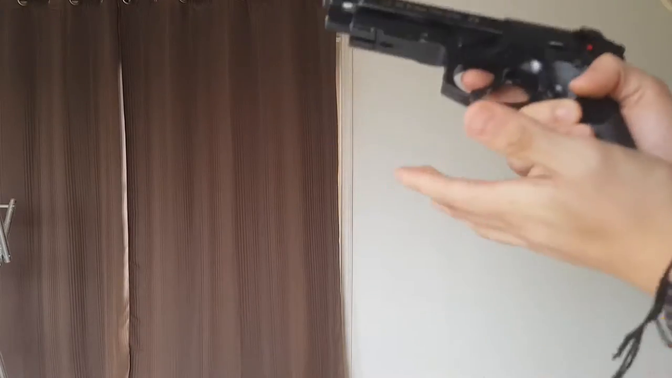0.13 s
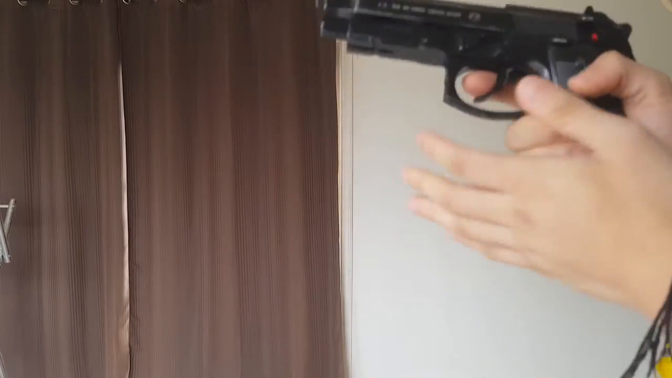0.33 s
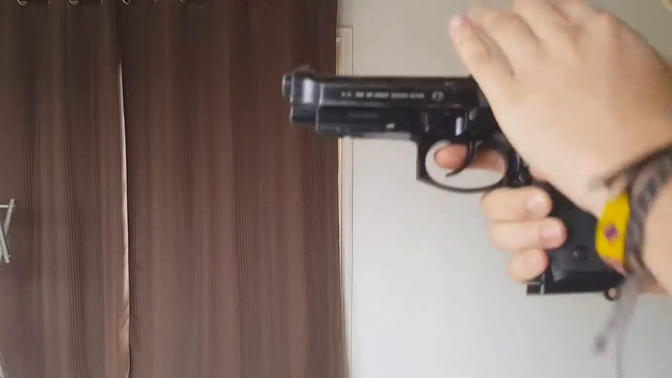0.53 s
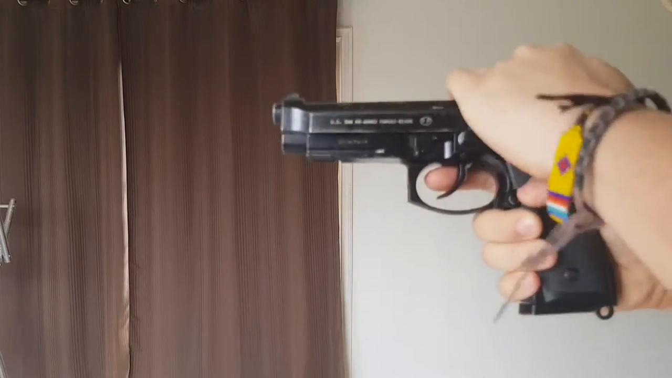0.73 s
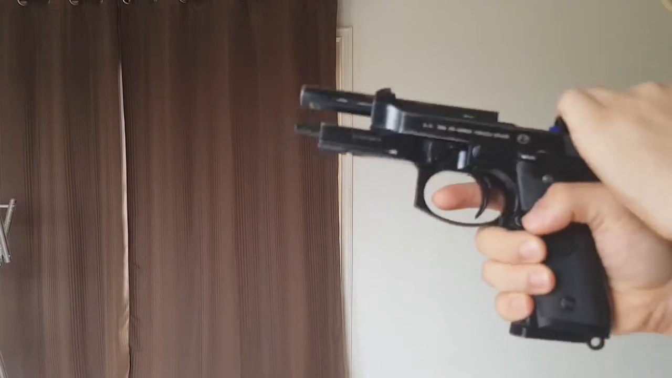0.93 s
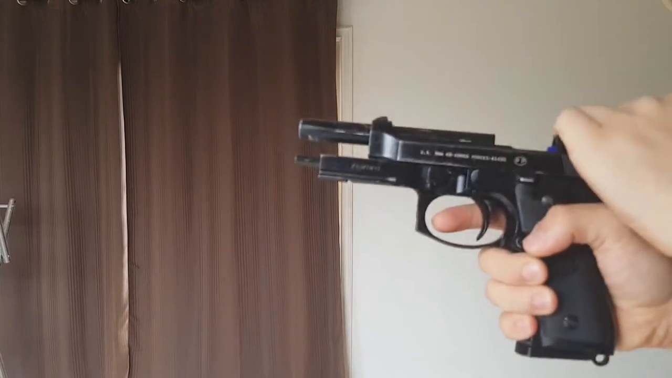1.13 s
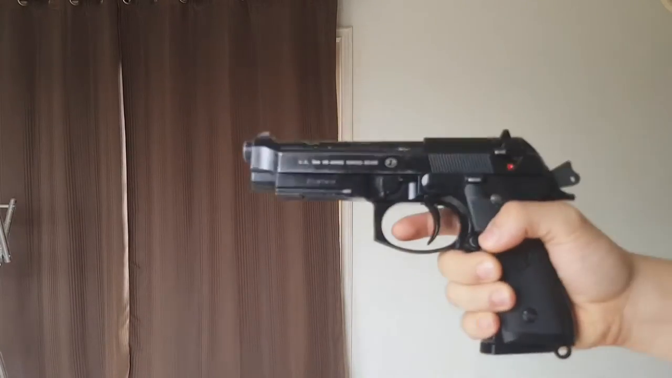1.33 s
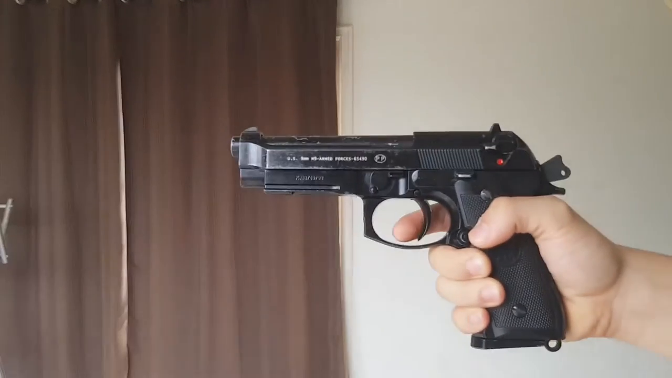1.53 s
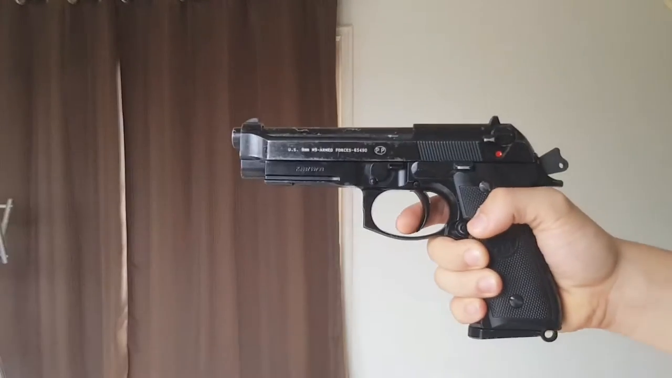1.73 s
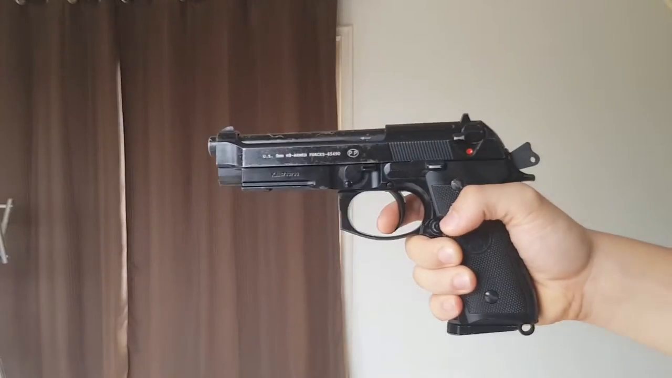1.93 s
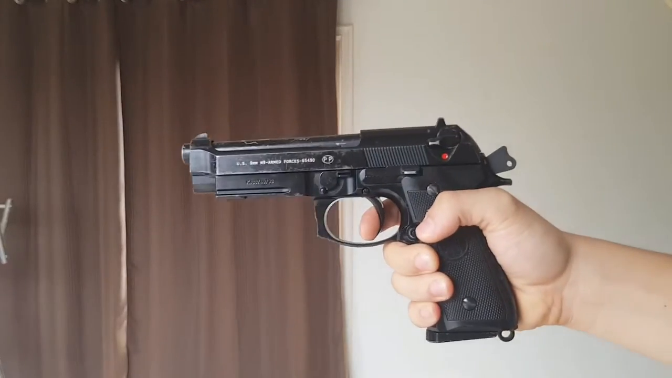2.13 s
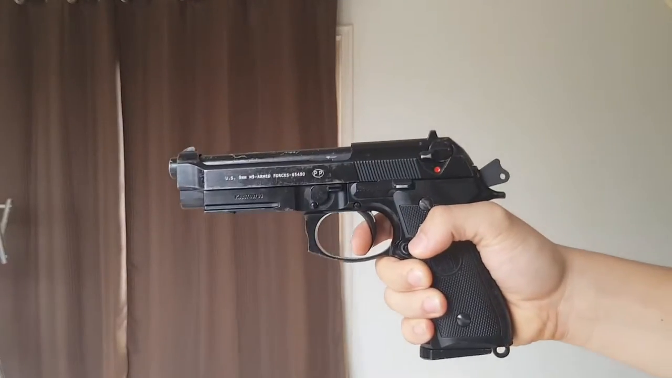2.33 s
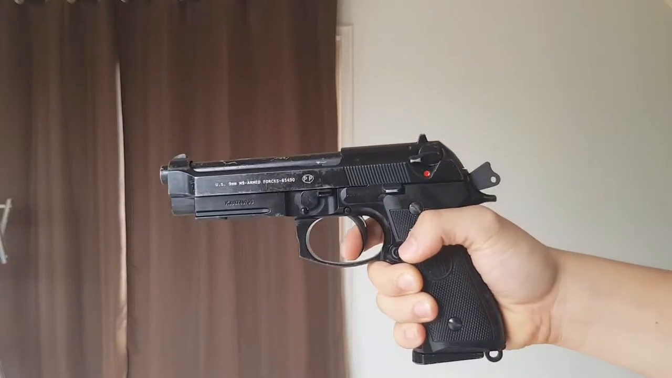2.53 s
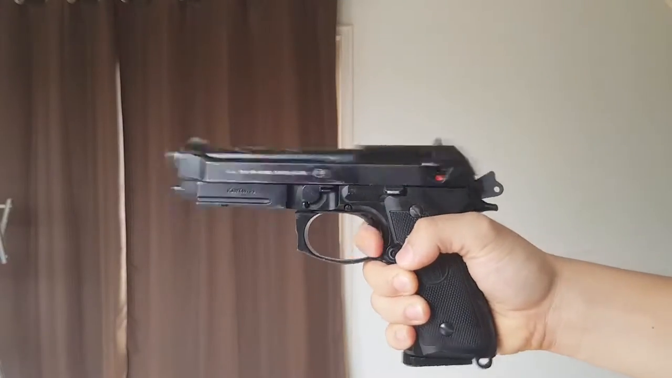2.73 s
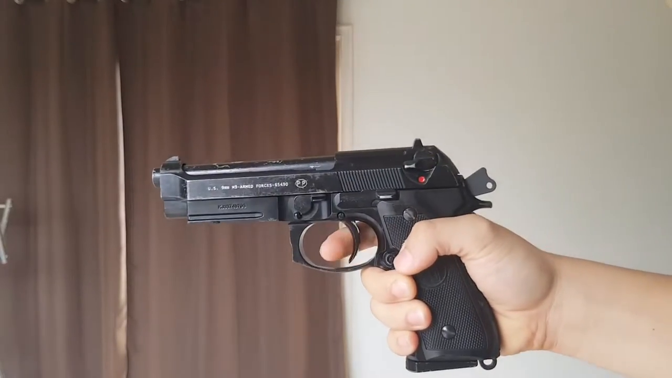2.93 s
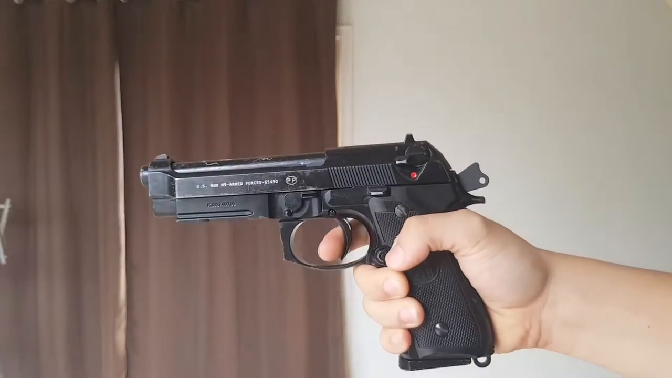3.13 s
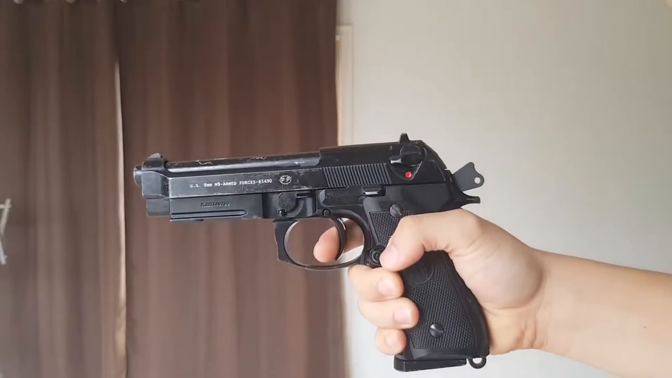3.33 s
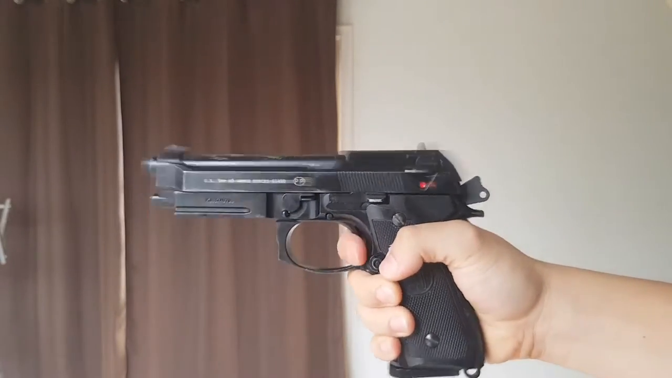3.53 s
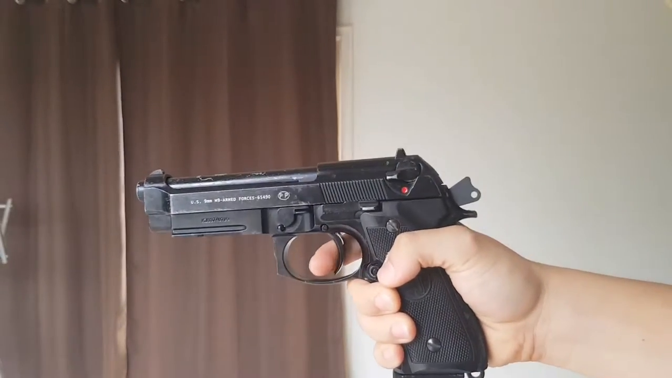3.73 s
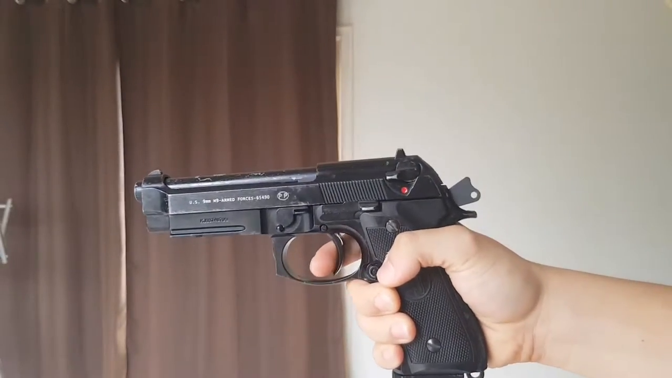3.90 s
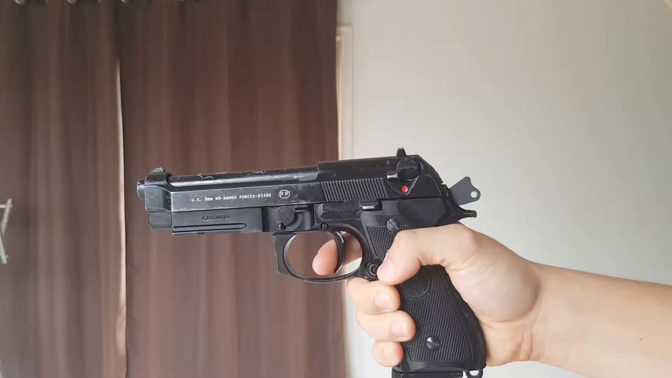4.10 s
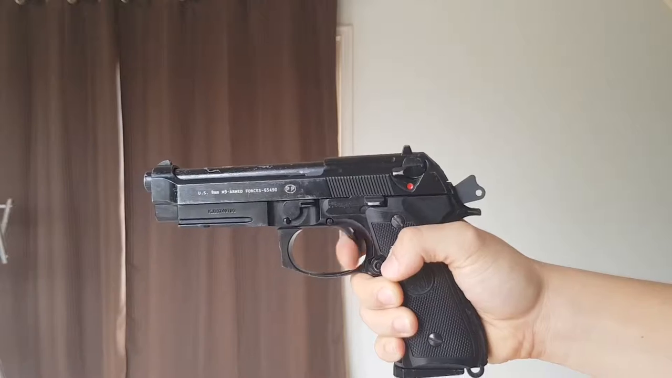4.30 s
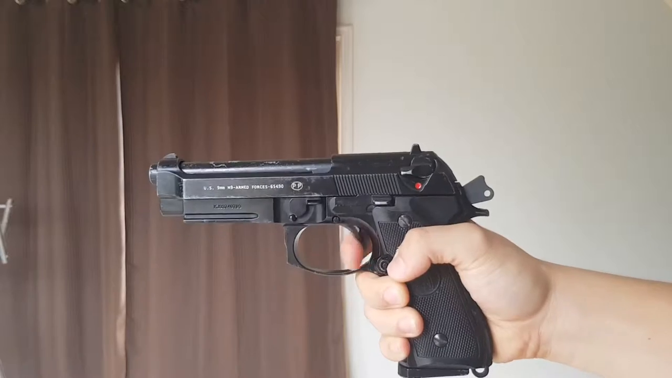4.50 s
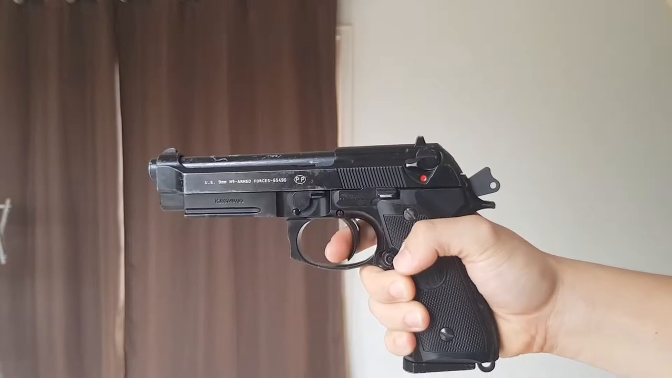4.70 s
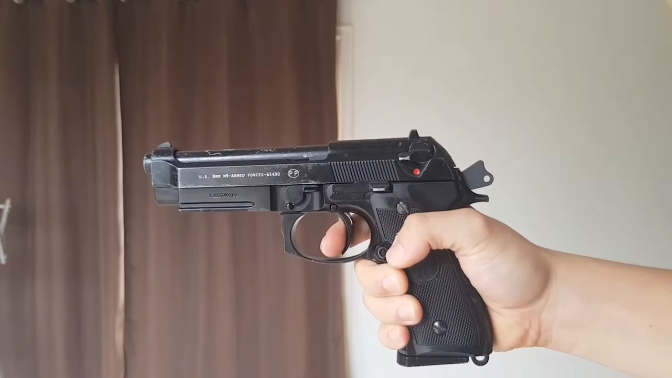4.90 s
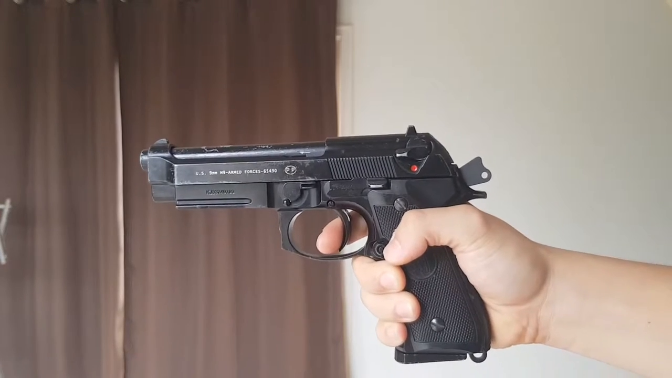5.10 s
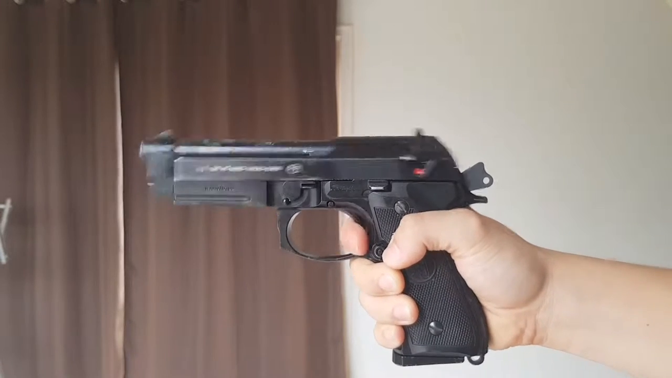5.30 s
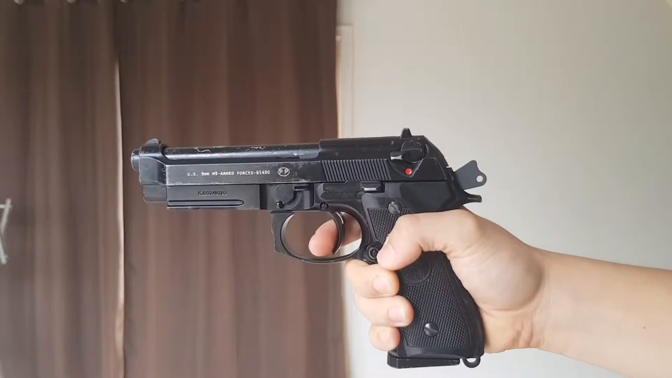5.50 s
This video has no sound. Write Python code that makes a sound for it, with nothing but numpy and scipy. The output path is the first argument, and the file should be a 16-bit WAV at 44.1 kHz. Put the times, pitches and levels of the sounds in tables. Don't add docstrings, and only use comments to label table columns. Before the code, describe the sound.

A phone close to a gas-powered replica pistol picks up a hard magazine knock, gritty steel clicks as the slide is pulled, and a loud multiple clack on release. After a pause with soft cloth rustle, four explosive gas pops ring briefly off the walls, with faint ticks and hiss between, over a low pulsing fan hum that gets quieter after each shot.

```python
import sys
import numpy as np
from scipy import signal
from scipy.fft import rfft, irfft, next_fast_len
from scipy.io import wavfile
from scipy.ndimage import uniform_filter1d, map_coordinates

SR = 44100
rng = np.random.default_rng(int(sys.argv[2]) if len(sys.argv) > 2 else 0)


def gain_from_db(level_db):
    decades = np.asarray(level_db, float) / 20
    return 10 ** decades


def to_wav(sig):
    pcm = np.clip(np.atleast_2d(sig), -1, 1) * 32767
    pcm = np.round(pcm).astype(np.int16)
    wavfile.write(sys.argv[1], SR, pcm.T)


N = 244755

MUZZLE_LAG, BREECH_LAG = 10, -2


def unit(x):
    return x / np.sqrt(np.mean(x ** 2) + 1e-20)


def along(points, hz):
    f, v = np.transpose(points)
    return np.interp(np.log(hz + 1), np.log(f + 1), v)


def wobble(rate):
    knots = rng.standard_normal(int(N * rate / SR) + 4)
    return map_coordinates(knots, [np.arange(N) * rate / SR])


def tilt(hz, db_per_octave):
    return db_per_octave * np.log2(np.clip(hz, 600, None) / 4000)


def ripple(depth_db, step_hz):
    knots = depth_db * rng.standard_normal(512)
    return lambda hz: np.interp(hz / step_hz, np.arange(len(knots)), knots)


def add(out, s, x):
    i = round(s * SR)
    out[:, i:i + x.shape[1]] += x[:, :out.shape[1] - i]


def noise(n, colour_db, alike):
    hz = np.fft.rfftfreq(n, 1 / SR)
    turn = np.arccos(np.clip(along(alike, hz), -1, 1)) / 2
    spectrum = rfft(rng.standard_normal((2, n))) * gain_from_db(colour_db(hz))
    mid, side = irfft(spectrum * [np.cos(turn), np.sin(turn)], n)
    return unit(np.array([mid + side, mid - side]))


def burst(colour_db, t60, alike, rise, lag):
    t = np.arange(4096) / SR
    fade = gain_from_db(-60 * t / t60) * (1 - np.exp(-t / rise))
    left, right = noise(len(t), colour_db, [(1000, alike)]) * fade
    left = np.pad(left, (max(-lag, 0), 0))[:len(t)]
    right = np.pad(right, (max(lag, 0), 0))[:len(t)]
    return np.array([left, right])


# (frequency [Hz], time to fall 60 dB [s])
ROOM_T60 = [(100, 0.79), (260, 0.69), (700, 0.65), (1840, 0.69), (4850, 0.57), (9000, 0.46), (12800, 0.38),
            (15200, 0.37)]
# (frequency [Hz], likeness [-1 to 1])
ROOM_ALIKE = [(60, -0.98), (180, 1), (550, 0.49), (1650, -0.088), (4970, 0.0717), (15000, -0.11)]


def reverb(colour_db, t60, rise):
    hz, t, z = signal.stft(noise(SR, colour_db, ROOM_ALIKE), SR, nperseg=256)
    fall_db = -60 * t / along(ROOM_T60, hz)[:, None]
    clumps = uniform_filter1d(rng.standard_normal(fall_db.shape), size=3, axis=0)
    clumps_db = 2.5 * unit(uniform_filter1d(clumps, size=6, axis=1))
    fade = gain_from_db(fall_db) + gain_from_db(-22.5 + fall_db / 2.27)
    tail = signal.istft(z * gain_from_db(clumps_db) * fade, SR, nperseg=256)[1]
    onset = 1 - np.exp(-np.arange(tail.shape[1]) / SR / rise)
    return tail * np.sqrt(t60) * onset


def ducking_db():
    fired = np.searchsorted(np.transpose(SHOTS)[0], np.arange(N) / SR)
    return -13 * (1 - 0.2 ** fired)


# (frequency [Hz], level [dB])
RUMBLE = [(15, -48), (30, -27.5), (50, -8), (66, -1), (80, -4.5), (97, -3), (125, -4), (158, -9),
          (200, -11.5), (250, -26), (300, -24), (500, -30), (1000, -38), (4000, -66)]
# (frequency [Hz], likeness [-1 to 1])
FAN_ALIKE = [(60, 0.99), (180, 1), (550, -0.082), (1650, -0.14), (4970, -0.01), (15000, -0.02)]
# (frequency [Hz], level [dB], unsteadiness [dB])
FAN_TONES = [(174.5, 1.5, 1.2), (268, -22, 3), (352, -28, 3)]


def fan():
    t = np.arange(N) / SR
    air = noise(next_fast_len(N, True), lambda hz: along(RUMBLE, hz), FAN_ALIKE)[:, :N]
    air = air * gain_from_db(0.37 * wobble(7.1))
    tones = np.zeros(N)
    for hz, db, loose_db in FAN_TONES:
        tones += gain_from_db(db + loose_db * wobble(5.3)) * np.sin(2 * np.pi * hz * t + 0.22 * wobble(1.8))
    beat_db = 1.5 * np.cos(2 * np.pi * (t - 0.87) / 0.91)
    return gain_from_db(-45 + beat_db + ducking_db()) * (air + tones) * gain_from_db([[1.1], [-1.1]])


# (middle [s], length [s], level [dB])
RUSTLES = [
    (2.318, .5, -65),
    (4.223, 0.26, -68),
]
# (frequency [Hz], level [dB per Hz])
CLOTH = [(150, -29.5), (350, -1), (700, -3), (1500, -11), (3000, -31), (8000, -60)]


def rustles():
    out = np.zeros((2, N))
    for middle, length, db in RUSTLES:
        n = round(length * SR)
        rub = noise(SR, lambda hz: along(CLOTH, hz), ROOM_ALIKE)[:, :n]
        add(out, middle - length / 2, gain_from_db(db) * np.hanning(n) * rub)
    return out


# (time [s], level [dB], time to fall 60 dB [s])
LEAKS = [
    (3.278, -55.5, 0.47),
    (4.292, -76.5, 0.38),
    (5.18, -81, 0.22),
]
# (frequency [Hz], level [dB per Hz])
LEAK = [(800, -31), (3000, 1.5), (6000, -4), (10000, -3), (15000, -11)]


def leaks():
    out, t = np.zeros((2, N)), np.arange(SR // 2) / SR
    for s, db, t60 in LEAKS:
        hiss = noise(len(t), lambda hz: along(LEAK, hz), ROOM_ALIKE)
        add(out, s, gain_from_db(db - 60 * t / t60) * (1 - np.exp(-t / 0.0022)) * hiss)
    return out


# (start [s], end [s], first level [dB], last level [dB])
SCRAPES = [
    (0.771, 0.848, -76, -57),
    (0.861, 0.948, -46, -47),
    (1.248, 1.282, -66.5, -48.5),
]
# (frequency [Hz], level [dB per Hz])
RAIL = [(500, -24.5), (1100, -6.5), (2500, 3.5), (3300, -17.5), (8000, -25.5), (15000, -29.5)]


def scrapes():
    out = np.zeros((2, N))
    for start, end, from_db, to_db in SCRAPES:
        n = round((end - start) * SR)
        grit = gain_from_db(2.4 * wobble(210)[:n])
        rub = noise(8192, lambda hz: along(RAIL, hz), ROOM_ALIKE)[:, :n]
        add(out, start, gain_from_db(np.linspace(from_db, to_db, n)) * grit * rub)
    return out


# (frequency [Hz], width [Hz], boost [dB])
RING = [(2160, 160, 4), (2614.4, 190, 4), (2890, 120, -0.5), (3859, 250, -1.5), (4630, 14, 10.5),
        (5400, 200, 1), (7229.8, 640, 5), (9400, 220, 3.5), (11640, 1000, 4.5)]


def slide_ring(hz, strength):
    return sum(k * db / (1 + (2 * (hz - c) / w) ** 2) for k, (c, w, db) in zip(strength, RING))


# (time [s], level [dB], time to fall 60 dB [s])
SEAT = [
    (0, -22.5, 0.16),
    (.004, -19.5, 0.056),
    (.019, -17.5, 0.077),
]
# (time [s], level [dB], time to fall 60 dB [s])
PULL = [(.794, -50.5, .015), (.814, -54, .025), (.840, -43.5, .015), (.856, -39, .02), (.860, -17, 0.0076),
        (.8622, -23, .015), (.879, -36.5, .03), (.897, -27.5, .025), (.914, -18.5, 0.034),
        (.918, -25.5, .015), (.927, -34.5, .02), (.940, -33, 0.028)]
# (time [s], level [dB], time to fall 60 dB [s])
RELEASE = [
    (1.259, -56.5, 0.034),
    (1.2795, -29.5, 0.039),
    (1.287, -21, 0.1),
    (1.296, -13, 0.035),
    (1.298, -10, .013),
    (1.303, -8.5, .022),
    (1.308, -27.5, 0.036),
    (1.315, -13, 0.022),
]
# (time [s], level [dB], time to fall 60 dB [s])
TAKE_UP = [
    (2.690, -41, 0.02689),
    (4.221, -68, 0.019),
    (5.227, -64.5, 0.01498),
]


def strikes():
    sears = [(s - 0.0285, -52.5, 0.014) for s, *_ in SHOTS]
    hammers = [(s - 0.014, click_db, 0.034) for s, *_, click_db in SHOTS]
    actions = [(SEAT, (-1.1, 1.1, 1, 1.1)),
               (PULL, (-1.2, -6.5, 0.85, 4)),
               (RELEASE, (-0.6, -2.5, 1.2, -1)),
               ([*TAKE_UP, *sears, *hammers], (-1.5, -4.5, 1.3211, -3))]
    rows = []
    for blows, (bright_db, *rest) in actions:
        for s, db, t60 in blows:
            rows.append((s, db, t60, bright_db + 0.1 * (db + 30), *rest))
    return rows


# (frequency [Hz], level [dB])
STEEL = [(120, -45.5), (400, -21.5), (800, -13.5), (1400, -9.5), (2500, -3.5), (4000, -3), (7000, -5),
         (12000, -3.5), (15500, -7)]


def contacts():
    out = np.zeros((2, N))
    for s, db, t60, bright_db, room_db, ring, knock_db in strikes():
        pan_db = 3 * rng.standard_normal()
        luck = ring * rng.normal(1, 0.13, len(RING))
        fine = ripple(depth_db=1.5, step_hz=251.35)

        def near(hz):
            knock = knock_db / (1 + (2 * (hz - 1050) / 500) ** 2)
            return along(STEEL, hz) + tilt(hz, bright_db) + slide_ring(hz, luck) + fine(hz) + knock

        def far(hz):
            return near(hz) + along([(500, -1), (2000, -4.5)], hz)

        crack = burst(near, t60, alike=0.66, rise=0.0001, lag=BREECH_LAG)
        add(out, s, gain_from_db(db) * crack * gain_from_db([[pan_db / 2], [-pan_db / 2]]))
        add(out, s, gain_from_db(db + room_db + 5) * reverb(far, t60, rise=0.00047))
    return out


# (time [s], left push, right push, ring [Hz], time to fall 60 dB [s])
PUFFS = [
    (.002, 0.064, 0.02694, 55, 0.13),
    (1.312, 0.037, 0.049, 55, 0.1),
    (2.7531, -0.5, -0.36, 62, 0.093),
    (3.5561, 0.86, -0.06, 50, 0.14),
    (4.4086, -0.54, -0.1, 62, 0.065),
    (5.279, -0.07, -.07, 131.7, 0.094),
]


def puffs():
    out, t = np.zeros((2, N)), np.arange(SR // 4) / SR
    for s, left, right, hz, t60 in PUFFS:
        swing = np.cos(2 * np.pi * hz * t + 1.2 * (1 - np.exp(-t * hz / 0.23)))
        size = 0.87 * gain_from_db(-60 * t / t60) + 0.52 * np.exp(-t / 0.0018)
        onset = 1 - np.exp(-t / 0.0001)
        add(out, s, np.outer([left, right], swing * size * onset))
    return out


# (delay [s], level [dB], time to fall 60 dB [s])
SLIDE_HOME = [
    (.052, -12.5, 0.032),
    (.058, -15.5, .045),
    (.068, -21, .035),
]
# (frequency [Hz], level [dB per Hz])
SLAM = [(120, -29.5), (200, -10), (1260, -7), (2060, -5), (2460, -9), (4310, -15), (4890, -15.5),
        (11000, -15), (15000, -13.5)]


def slams():
    out = np.zeros((2, N))
    colour = lambda hz: along(SLAM, hz)
    for fired, *_ in SHOTS:
        for delay, db, t60 in SLIDE_HOME:
            db = db + 0.5 * rng.standard_normal()
            clack = burst(colour, t60, alike=0.31, rise=0.00071, lag=BREECH_LAG)
            add(out, fired + delay, gain_from_db(db) * clack)
            add(out, fired + delay, gain_from_db(db + 3) * reverb(colour, t60, rise=0.0013))
    return out


# (time [s], blast [dB], room [dB], slide ring [0 to 1], hammer click [dB])
SHOTS = [
    (2.753, -12, 6, .3, -33),
    (3.5564, -12.5, 3, .2, -43.5),
    (4.4084, -8.5, -0.5, 0.1, -49),
    (5.2783, -9, 0, .8, -49),
]
# (delay [s], level [dB], time to fall 60 dB [s])
BURSTS = [
    (0, 3, .012),
    (.002, 0, .008),
    (.0065, -1, .015),
    (.0085, -3, .015),
    (.0155, -3, .05),
    (.03, -8, .05),
]
# (frequency [Hz], level [dB per Hz])
GAS = [(71, -36), (120, 1), (323, -2), (740, -2.5), (1360, -3.5), (2250, -2), (3230, -5), (4200, -3.5),
       (5800, -8), (11500, -8), (15000, -7.5)]


def shots():
    out, lead = np.zeros((2, N)), 256
    u = np.arange(4096) / SR / 0.00024
    pop = (1 - u) * np.exp(-u) * (1 - np.exp(-4 * u)) * np.ones((2, 1))
    pop[1] = np.roll(pop[1], MUZZLE_LAG // 2)
    for s, blast_db, room_db, ring, _ in SHOTS:
        pop_db = blast_db + 12.5
        luck = ring * rng.normal(1, 0.3, len(RING))
        fine = ripple(depth_db=1.8, step_hz=70.9)
        gas = lambda hz: along(GAS, hz) + tilt(hz, 0.94) + slide_ring(hz, luck) + fine(hz)
        for delay, db, t60 in BURSTS:
            lumps = ripple(depth_db=3.5, step_hz=351)
            lumpy = lambda hz: gas(hz) + lumps(hz)
            blast = burst(lumpy, t60, alike=0.19, rise=0.000052, lag=MUZZLE_LAG)
            add(out, s + delay, gain_from_db(blast_db + db) * blast)
            add(out, s + delay, gain_from_db(blast_db + db + room_db + 4) * reverb(gas, t60, rise=0.004))
        add(out, s + 0.0065, gain_from_db(pop_db) * pop)
        add(out, s + 0.0086, gain_from_db(pop_db + 0.5) * pop)
        opening = burst(gas, t60=0.013, alike=0.5, rise=0.0001, lag=MUZZLE_LAG)[:, lead::-1]
        add(out, s - lead / SR, gain_from_db(blast_db - 11.5) * opening)
    return out


def scene():
    t = np.arange(N) / SR - PUFFS[3][0]
    pinned = (t > 0) & (t < 0.006)
    deaf = gain_from_db(np.array([[-16], [0]]) * pinned)
    pistol = leaks() + scrapes() + contacts() + slams() + shots()
    return fan() + rustles() + puffs() + pistol * deaf


def band_limit(x):
    return signal.sosfilt(signal.butter(12, 16670, fs=SR, output="sos"), x)


# (frequency [Hz], gain [dB])
MICROPHONE = [(15, 2.5), (30, 0.5), (50, -1), (13000, 2.5), (15250, -1), (15600, -41.5), (16000, -63)]


def record(dry):
    x = dry + gain_from_db(-93.5) * rng.standard_normal(dry.shape)
    m = next_fast_len(N, True)
    colour = gain_from_db(along(MICROPHONE, np.fft.rfftfreq(m, 1 / SR)))
    x = irfft(rfft(x, m) * colour, m)[:, :N]
    mix = x / (1 + np.abs(x / 0.98) ** 6) ** (1 / 6)
    return band_limit(mix)


dry = scene()
out = record(dry)
to_wav(out)
```